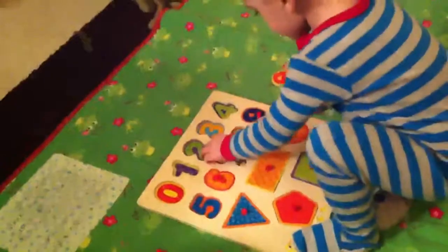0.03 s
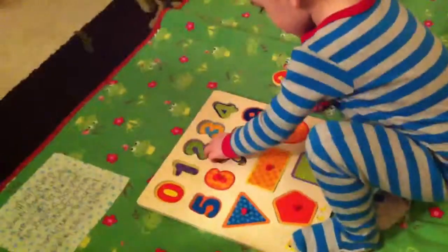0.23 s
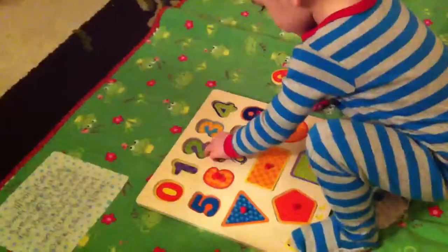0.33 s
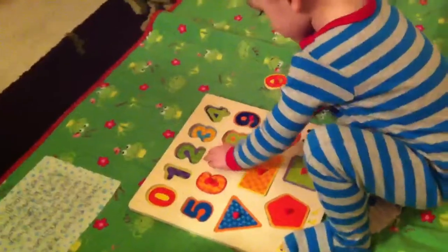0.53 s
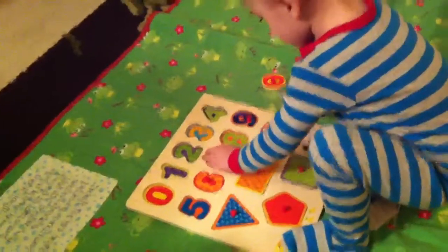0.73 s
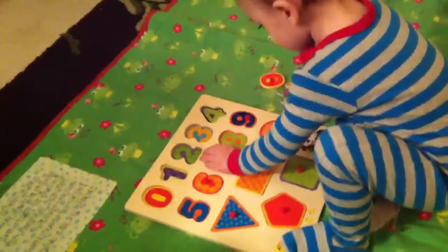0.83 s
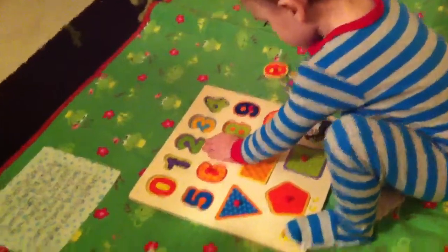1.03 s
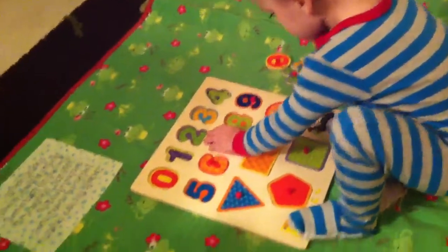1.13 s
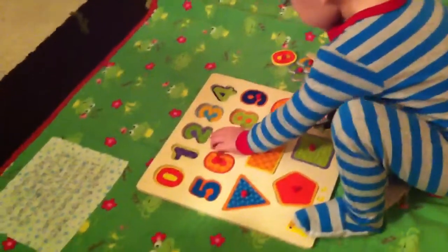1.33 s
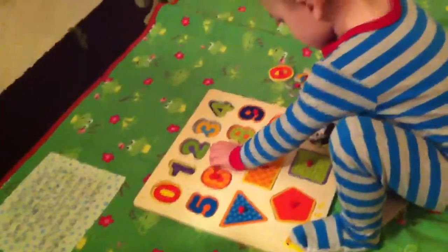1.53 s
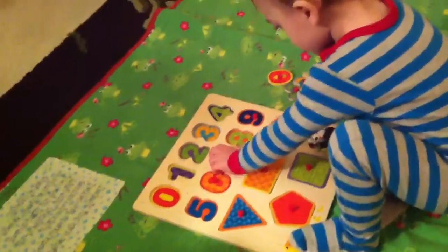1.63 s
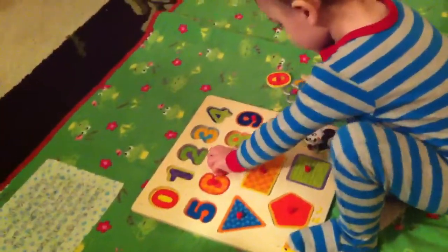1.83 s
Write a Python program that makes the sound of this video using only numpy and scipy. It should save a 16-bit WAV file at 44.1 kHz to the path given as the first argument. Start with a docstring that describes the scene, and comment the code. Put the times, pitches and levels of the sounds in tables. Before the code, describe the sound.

Wooden puzzle pieces knock on a thin board as a child moves them. A few separate dry taps, one sharper than the rest, lead to a quick clatter and faint ticks, with light scuffs in a small, quiet room.

```python
"""Wooden puzzle pieces knock and slide as a child moves them on a thin board lying on a play mat.
Each knock rings the damped board and the piece itself, with a ping and a dry tick from its edge.
Between knocks the pieces scuff and rub, and hand and board bump softly on the mat.
A small quiet room adds a few early echoes and a short tail, over low room noise and microphone hiss."""
import sys
import numpy as np
from scipy import signal
from scipy.fft import rfft, irfft
from scipy.io import wavfile

SR = 44100
rng = np.random.default_rng(int(sys.argv[2]) if len(sys.argv) > 2 else 0)


def persist_wave(psi):
    """Save psi, clipped to +-1, as 16-bit WAV."""
    counts = np.round(np.clip(psi, -1, 1) * 32767).astype(np.int16)
    wavfile.write(sys.argv[1], SR, np.atleast_2d(counts).T)


N = 83790

# EQ of the room noise and hiss: frequency_hz, gain_db
ROOM_TONE_EQ = [(25, -9), (50, -24), (80, -13), (125, -1), (185, 2), (360, -5), (600, -7.5), (1000, -7),
                (1500, -10.5), (2100, -5.5), (2600, -13.5), (5000, -13.5), (12000, -16), (15500, -16.5)]
# Modes of the board: pitch_hz, gain_db, t60_s
BOARD_MODES = [(286, -20, 0.04), (357, -13.5, 0.021), (770, -3, 0.032), (960, -25, 0.071), (1065, 3, 0.07),
               (1148, -1, 0.021), (1430, -2.5, 0.0074), (1760, -2.5, 0.019), (2104, 2, 0.0087),
               (2470, -1, 0.0087), (3830, -7, 0.0036), (4700, -14, 0.012), (5200, -7, .005)]
# Bands where the board's two faces cancel and it hardly radiates: centre_hz, width_hz
BOARD_NOTCHES = [(590, 109), (3350, 300)]
# Piece hits: start_s, level_db, contact_cutoff_hz, piece_pitch_hz, piece_db, edge_pitch_hz, edge_db,
# tick_db. A higher cutoff is a harder hit; edge and tick levels are relative to the knock's body.
KNOCK_CUES = [(.0035, -35.5, 1970, 740, 0.5, 3120, -15.5, -13.5),
              (.2149, -15, 3830, 2046, 3, 4220, -21.5, -21.5),
              (0.2303, -23.5, 2400, 2107, -48, 3330, -11, -45),
              (0.4742, -49, 1290, 1090, 5, 5460, -34, -21), (.4895, -50, 1180, 960, 12, 5460, -26, -20),
              (.4990, -31.5, 2180, 1080, -50, 5500, -21, -14),
              (.5019, -30.5, 1530, 1060, -42, 5500, -22.5, -28),
              (.8930, -22, 1940, 770, 5.5, 4430, -17.5, -20), (.9935, -48, 1810, 1350, 25, 4000, -28, -24),
              (1.0018, -39, 2470, 588.6, 6, 3520, -12.5, -17),
              (1.3075, -54, 2000, 890, -19, 5550, -23, -30), (1.3157, -41, 1890, 1244, -32, 5400, 0.5, -3),
              (1.3317, -27, 2500, 1130, 3, 5450, -41, -13),
              (1.3342, -33, 2720, 2580, 1.5, 5400, -44, -17.5),
              (1.3462, -29.5, 2130, 1670, -30, 5540, -28, -35),
              (1.3651, -27.5, 1700, 860, 0, 5400, -20.5, -12), (1.5715, -49, 2600, 444, 30, 6400, -9, -12),
              (1.6495, -56, 2400, 2030, 10, 5560, -10, -15),
              (1.6533, -58.5, 2570, 1950, 17, 5500, -16, -24),
              (1.6662, -61, 2550, 2140, 17, 5650, -20, -20), (1.7418, -45.5, 1850, 790, 19, 5800, -32, -6),
              (1.7465, -83, 1230, 517, 7, 5570, -18, -20), (1.7638, -54, 3220, 2230, 18, 5500, -29, -20)]
# Bumps on the mat: middle_s, half_length_s, level_db, pitch_hz
BUMP_CUES = [(.006, 0.009, -57.5, 170), (0.465, 0.0044, -59.5, 292), (0.559, 0.015, -62.5, 171),
             (0.904, 0.0068, -69, 111), (1.03, 0.033, -67, 156), (1.657, 0.011, -65, 284),
             (1.759, 0.023, -63.5, 313)]
# Reflections off near surfaces: delay_s, gain_db
EARLY_ECHOES = [(.0086, -18), (0.0118, -18.5), (0.0163, -27.5), (0.0219, -18), (0.031, -21)]
# Diffuse tail of the room: frequency_hz, gain_db, t60_s
ROOM_TAIL = [(150, -13, .35), (387, -4.5, 0.24), (970, -7, 0.19), (1940, -21.5, 0.4), (3800, -1.5, 0.17),
             (5370, -12.5, 0.15), (14600, -5, 0.1)]
# Scuffs of a sliding piece: middle_s, half_length_s, level_db
SCUFF_CUES = [(0.199, 0.0038, -52.5), (0.472, 0.0059, -62), (1.008, 0.0026, -73), (1.311, 0.0026, -55),
              (1.3161, .0016, -49), (1.33, 0.015, -56), (1.34, 0.005, -81), (1.545, .004, -95),
              (1.572, 0.0043, -66), (1.737, .003, -60)]
# EQ of the scuffs: frequency_hz, gain_db
SCUFF_EQ = [(200, -2), (1000, 9.5), (2200, 0), (3800, -29), (5500, 0.5), (8000, -15), (11000, -9.5),
            (14000, -10)]
# Light rubs that stir the board: middle_s, half_length_s, level_db
RUB_CUES = [(1.044, 0.0092, -65.5), (1.554, 0.0037, -63.5), (1.803, 0.0088, -82)]

PIECE_T60_S, EDGE_T60_S, TICK_DECAY_S = 0.0047, 0.0058, 0.0013
KNOCK_LOW_CUT_HZ, TICK_LOW_CUT_HZ, HANDLING_LOW_CUT_HZ = 216, 5500, 102
BEND_HZ = 2740  # bending waves below this arrive a little behind the treble
TAIL_PREDELAY_S, TAIL_ATTACK_S, ECHO_HIGH_CUT_HZ = 0.0023, 0.0039, 4660
ROOM_TONE_DB, GRIT_SPREAD_DB, MASTER_HIGH_CUT_HZ = -67.5, 14, 15900


def undb(db):
    return 10 ** (np.asarray(db) / 20)


def unit_rms(x):
    return x / np.sqrt(np.mean(x ** 2))


def unit_peak(x):
    return x / np.abs(x).max()


def eq(x, points):
    """Filter by (Hz, dB) points joined on a log-frequency axis."""
    hz, db = np.array(points, float).T
    bins_hz = np.maximum(np.arange(len(x) // 2 + 1) * SR / len(x), 1)
    gain = undb(np.interp(np.log(bins_hz), np.log(hz), db))
    return irfft(rfft(x) * gain, len(x))


def butter(x, hz, kind, order):
    """Causal low- or high-pass."""
    return signal.sosfilt(signal.butter(order, hz, kind, fs=SR, output="sos"), x)


def mode(hz, t60):
    """A tenth of a second of one damped resonance, gain 1 at its centre."""
    t, rate = np.arange(SR // 10) / SR, np.log(1000) / t60
    return 2 * rate / SR * np.exp(-rate * t) * np.cos(2 * np.pi * hz * t)


def swell(middle_s, half_s):
    """A bell-shaped fade in and out."""
    return np.exp(-.5 * ((np.arange(N) / SR - middle_s) / half_s) ** 2)


def room_tone():
    """A steady bed of low room noise and even microphone hiss."""
    return undb(ROOM_TONE_DB) * unit_rms(eq(rng.standard_normal(N), ROOM_TONE_EQ))


def board_ring():
    """The board's modes after one sharp tap; two all-passes delay the slower, low bending waves."""
    ring = sum(undb(db) * mode(hz, t60) for hz, db, t60 in BOARD_MODES)
    warped = np.tan(np.pi * BEND_HZ / SR)
    coeff = (warped - 1) / (warped + 1)
    for _ in range(2):
        ring = signal.lfilter([coeff, 1], [1, coeff], ring)
    return ring


def knocks():
    """Board and piece ring together, duller on a soft contact; the edge adds a ping and a dry tick."""
    ring = board_ring()
    t = np.arange(len(ring)) / SR
    track = np.zeros(N + len(ring))
    for start_s, level_db, contact_hz, piece_hz, piece_db, edge_hz, edge_db, tick_db in KNOCK_CUES:
        body = ring + undb(piece_db) * mode(piece_hz, PIECE_T60_S)
        for hz, width_hz in BOARD_NOTCHES:
            body = signal.lfilter(*signal.iirnotch(hz, hz / width_hz, fs=SR), body)
        body = unit_peak(butter(body, contact_hz, "low", order=4))
        ping = unit_peak(butter(mode(edge_hz, EDGE_T60_S), edge_hz, "low", order=2))
        burst = rng.standard_normal(len(t)) * np.exp(-t / TICK_DECAY_S)
        tick = unit_peak(butter(burst, TICK_LOW_CUT_HZ, "high", order=1))
        i = int(start_s * SR)
        track[i:i + len(t)] += undb(level_db) * (body + undb(edge_db) * ping + undb(tick_db) * tick)
    return butter(track[:N], KNOCK_LOW_CUT_HZ, "high", order=2)  # a small board radiates little bass


def mat_bumps():
    """Hand and board shove the mat: padded thuds of noise through one low resonance."""
    track = np.zeros(N)
    for middle_s, half_s, level_db, hz in BUMP_CUES:
        rumble = signal.fftconvolve(rng.standard_normal(N), mode(hz, t60=0.033))[:N]
        muffled = unit_rms(butter(rumble, 2 * hz, "low", order=2))
        track += undb(level_db) * swell(middle_s, half_s) * muffled
    return track


def small_room(x):
    """Direct sound, dulled echoes off near surfaces and a short diffuse tail in half-octave bands."""
    t = np.arange(SR // 2) / SR
    hz, db, t60 = np.array(ROOM_TAIL, float).T
    bins_hz = np.arange(len(t) // 2 + 1) * SR / len(t)
    spectrum = rfft(rng.standard_normal(len(t)))
    attack = 1 - np.exp(-np.maximum(t - TAIL_PREDELAY_S, 0) / TAIL_ATTACK_S)
    response = np.zeros(len(t))
    for low_hz in 88 * 2 ** (np.arange(15) / 2):
        high_hz = low_hz * np.sqrt(2)
        log_centre = np.log(low_hz * high_hz) / 2
        gain = undb(np.interp(log_centre, np.log(hz), db))
        decay = np.exp(-np.log(1000) * t / np.interp(log_centre, np.log(hz), t60))
        band = irfft(spectrum * ((bins_hz >= low_hz) & (bins_hz < high_hz)), len(t)) * attack * decay
        response += gain * band * np.sqrt(2 * (high_hz - low_hz) / SR / np.sum(band ** 2))
    echoes = np.zeros(len(t))
    for delay_s, echo_db in EARLY_ECHOES:
        echoes[int(delay_s * SR)] += undb(echo_db)
    response += butter(echoes, ECHO_HIGH_CUT_HZ, "low", order=3)
    response[0] += 1  # direct sound
    return signal.fftconvolve(x, response)[:N]


def grit():
    """Friction noise: dense, uneven catches of wood on wood."""
    return rng.standard_normal(N) * undb(-GRIT_SPREAD_DB * rng.standard_normal(N))


def scuffs():
    """A piece slides on its edge in short, bright swells of grit."""
    scrape = unit_rms(eq(grit(), SCUFF_EQ))
    return sum(scrape * undb(db) * swell(middle_s, half_s) for middle_s, half_s, db in SCUFF_CUES)


def rubs():
    """Light friction stirs the board's modes for a duller, woody rasp."""
    rasp = unit_rms(signal.fftconvolve(grit(), board_ring())[:N])
    return sum(rasp * undb(db) * swell(middle_s, half_s) for middle_s, half_s, db in RUB_CUES)


def scene():
    """Knocks and handling share the room, over the room tone, in mono."""
    handling = butter(scuffs() + rubs() + mat_bumps(), HANDLING_LOW_CUT_HZ, "high", order=4)
    return (small_room(knocks() + handling) + room_tone())[None]


def record(dry):
    """A steep high cut takes the very top off the mix."""
    return signal.sosfilt(signal.ellip(10, .2, 70, MASTER_HIGH_CUT_HZ, fs=SR, output="sos"), dry)


dry = scene()
out = record(dry)
persist_wave(out)
```